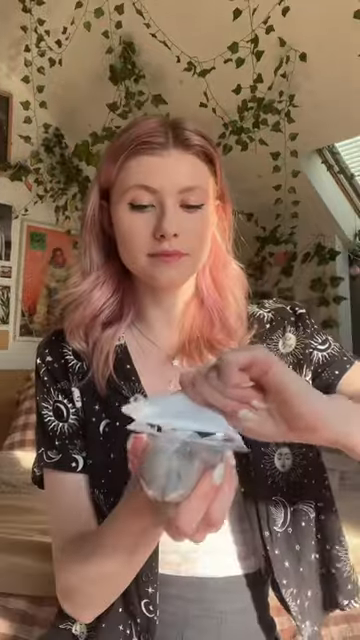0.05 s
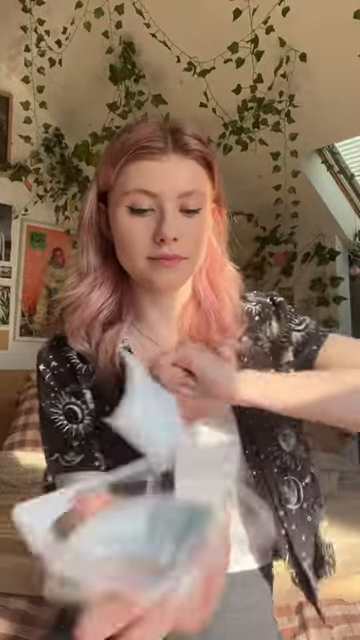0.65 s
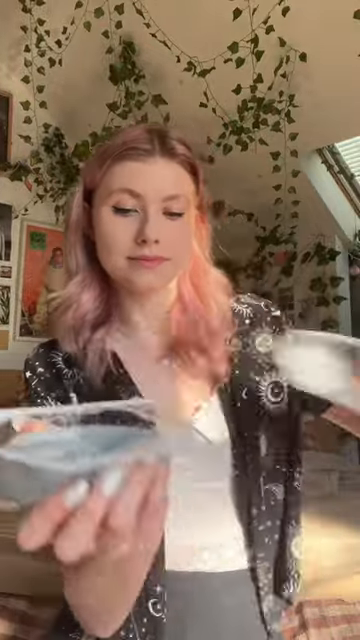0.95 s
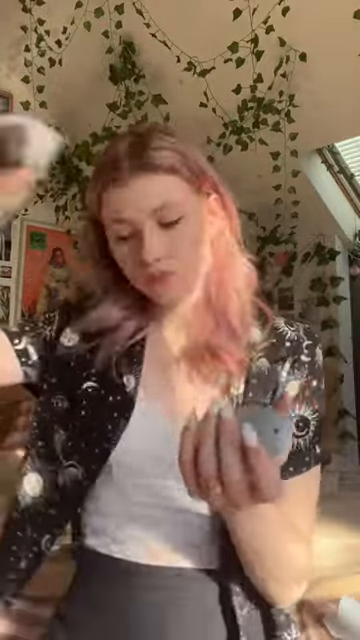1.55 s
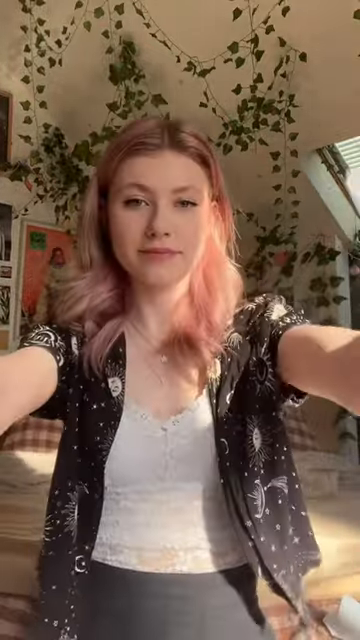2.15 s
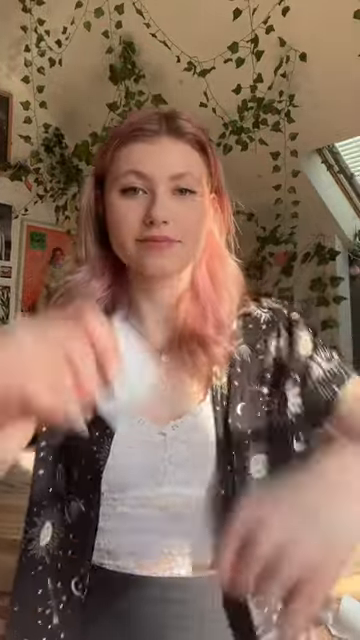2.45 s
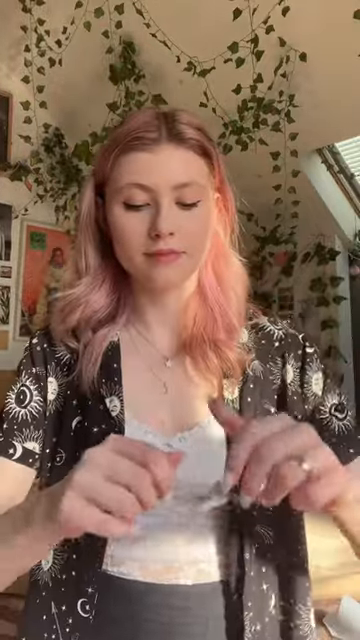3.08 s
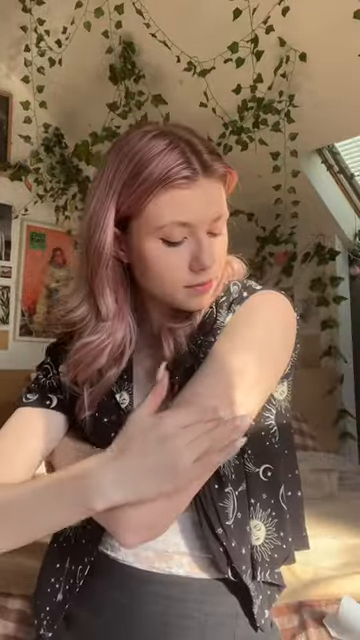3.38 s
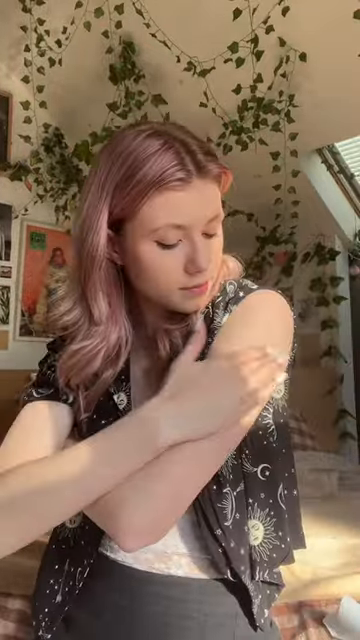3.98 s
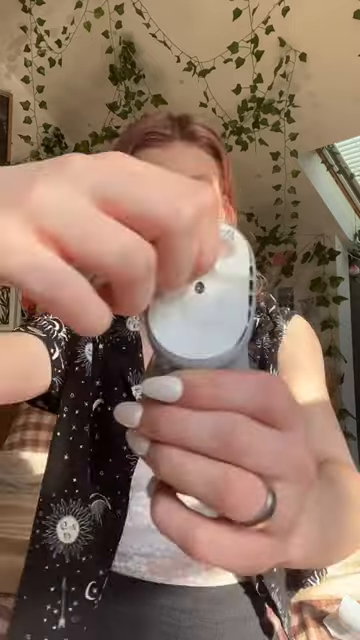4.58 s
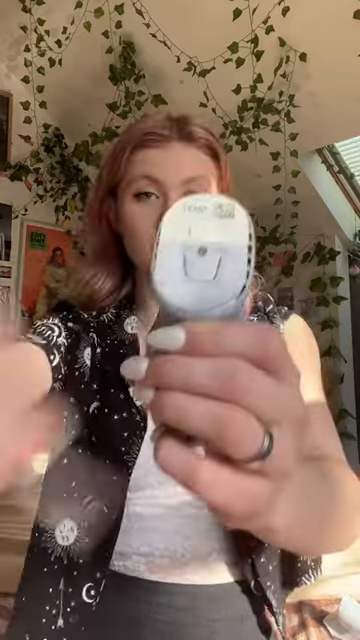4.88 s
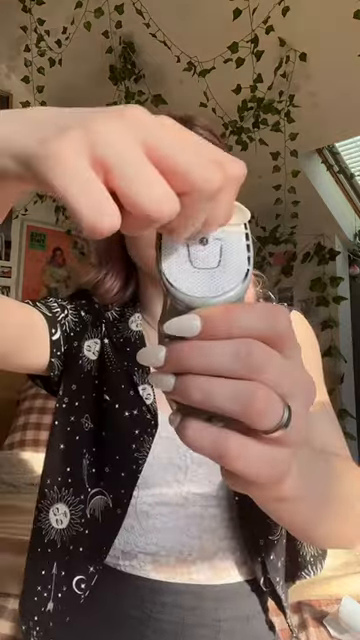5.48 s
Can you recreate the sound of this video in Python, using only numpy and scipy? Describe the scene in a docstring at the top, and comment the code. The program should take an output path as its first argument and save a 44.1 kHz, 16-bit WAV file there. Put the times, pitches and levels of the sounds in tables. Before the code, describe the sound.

A paper lid crinkles off a thin plastic tray, a sachet rips, a hand softly rubs skin, and a plastic cap clicks off.

```python
"""A small bedroom with a low rumble; mono, close to a phone. A paper lid peels off a thin plastic tray:
the glued seam slips, the tray rings, buckles and is put aside. A paper sachet rips in a run of snaps,
then a strip is pulled apart. A palm rubs an arm and squeaks while a faint tone comes and goes.
A plastic cap slides off with two clicks; a fingernail taps last.
The sound drops out briefly between some of the actions."""
import sys
import numpy as np
from scipy import signal
from scipy.fft import rfft, irfft
from scipy.io import wavfile
from scipy.ndimage import uniform_filter1d

SR = 44100
rng = np.random.default_rng(int(sys.argv[2]) if len(sys.argv) > 2 else 0)


def dump_mix(stems):
    """Bounce the given channels to the path in sys.argv[1] as a 16-bit WAV at rate SR."""
    frames = np.atleast_2d(stems).T  # one column per channel
    limited = np.clip(frames, -1, 1)  # hard clip at full scale
    pcm = np.round(limited * 32767).astype(np.int16)
    wavfile.write(sys.argv[1], SR, pcm)


N = 243889
TIME_S = np.arange(N) / SR
FREQS_HZ = np.arange(N // 2 + 1) * SR / N + 1e-3
OCTAVES_HZ = 125 * 2. ** np.arange(8)

# pulls on the lid; the favoured ring pitch moves as the seal's edge travels
# (start [s], length [s], level [dB], swell [dB], tilt [dB/oct], favoured [Hz], ring re seam [dB])
LID_PULLS = [(-.02, 0.046, -34.5, -6, 6.5, 422.7, -7), (.03, 0.13, -37.5, 2.5, -3, 401.5, -3.5),
             (.18, 0.12, -34.5, 4, -0.6, 500, -3.5), (.322, 0.07, -28, -1.5, -1, 1098, -3),
             (.464, 0.077, -36.5, -8.5, 1, 650, -1.5), (.595, 0.071, -48, -10, 0.5, 1290, -14)]
# tray resonances (centre [Hz], width [Hz], level [dB])
TRAY_MODES = [(451, 27, 2.5), (652, 22, -1), (1000, 32, -6), (1227, 60, -2), (1290, 9.1, 1),
              (1418, 190, -10.5), (1860, 120, -3), (2316, 140, 0.5), (2540, 78, -6), (3960, 56, -6.5),
              (3730, 120, -3), (4280, 90, -6.5)]

# jolts (time [s], level over 5 ms [dB], low edge [Hz], top edge [Hz], ring [Hz], ring [dB], contact [ms])
TRAY_SNAPS = [(0.0879, -13, 130, 9570, 4400, -2.5, 1.3), (0.3036, -12, 397, 13880, 5040, -2, 0.99),
              (0.5315, -30, 210, 7850, 4700, -2, 11), (0.57, -33.5, 410, 4830, 4560, 6, 2.9),
              (0.5885, -27.5, 354, 3500, 3660, 5.5, 6.4), (0.647, -42.5, 200, 2500, 1220, 9, 4.5),
              (0.7535, -44.5, 55, 5900, 3270, 8, 3.3), (0.806, -45, 101, 1998, 600, 21, 3.4),
              (1.046, -45, 55, 3970, 1350, 18, 5), (1.069, -39, 340, 9100, 1250, -10, 3.3),
              (1.074, -28, 710, 5530, 1200, -8, 6.2), (1.125, -31.5, 55, 7000, 1160, 6, 5.4),
              (1.1405, -26.5, 198, 2000, 2950, 8, 3.5), (1.207, -23, 380, 4070, 874, 5.5, 3.6),
              (1.2472, -25.5, 510, 9500, 2600, -6, 8.3), (1.3158, -41.5, 55, 4900, 2950, 9, 7.3),
              (1.3605, -42.5, 55, 20000, 3070, 6, 5.1), (1.553, -46.5, 55, 4530, 1170, 3, 5.5),
              (1.573, -45, 54.6, 4360, 2470, 3, 6.8), (1.597, -47.5, 55, 3240, 1260, 15, 6.6),
              (1.6958, -42, 900, 20100, 14100, 5, 2.8), (1.797, -39, 55, 3530, 1200, 2, 5.5),
              (1.8538, -39.5, 55.5, 5800, 310, 15, 18), (1.913, -49, 54.4, 3560, 2800, 17, 1.5)]
PAPER_CREASES = [(1.99, -36.5, 310, 6600, 4217, -10, 0.24), (2.3805, -47.5, 54.8, 8440, 3050, 7.5, 1.1),
                 (2.4448, -45, 54.3, 4280, 2800, 18, 12), (2.5955, -34.5, 90, 19800, 5760, 4, 5.4),
                 (2.607, -37, 56, 20000, 5270, -16, 0.88), (2.617, -41, 196, 20030, 754, -11, 1.1),
                 (2.6526, -36.5, 3000, 20000, 12000, 7, 0.26), (3.016, -58, 55, 4800, 2630, -6, 3)]
CAP_CLICKS = [(4.6495, -42.5, 900, 13900, 7450, 20, 0.74), (4.7359, -21, 1500, 5000, 8610, 15, 2.3),
              (4.7368, -22.5, 466, 970, 640, 0.69, .3), (4.7692, -22.5, 250, 6070, 3600, 2.4, 1.46),
              (4.7716, -24, 700, 5400, 5640, 4, 2.2), (5.497, -52.5, 56, 12100, 701, 10.4, 7.2)]

# friction strokes (start [s], length [s], level [dB], swell [dB], tilt [dB/oct])
FINGER_STROKES = [(.72, 0.24, -65.5, 3, 1.5), (.928, 0.066, -49, 8.5, 5.5), (1.07, 0.1, -41, -5.5, -2),
                  (1.335, 0.06, -49.5, 2, 0), (1.45, 0.093, -55.5, -7, -1.5),
                  (1.555, 0.042, -52.5, -0.5, -1), (1.72, 0.08, -61, 17, -1), (1.795, .085, -46, 3.5, -9),
                  (2.355, 0.13, -59, -9, 8.5), (2.53, 0.38, -61.5, -6.5, 0), (2.92, .065, -61.5, 0, 6)]
TEAR_STROKES = [(1.993, .048, -33, 12, 0.94)]
STRIP_PULLS = [(2.59, 0.028, -43.5, 6, -1.5), (2.64, 0.048, -38, -3, 1.5), (2.69, 0.062, -37.5, 7.5, 2.5)]
ARM_STROKES = [(3.17, 0.2, -72, -4, 1), (3.62, 0.46, -68, 3, 1.5), (4.07, 0.068, -64.5, -1, -4),
               (4.27, 0.16, -62.5, 1, 7)]
CAP_STROKES = [(4.646, 0.151, -38.5, 9.1, 0.38)]

# spells of a faint tone (start [s], length [s], level [dB], swell [dB], pitch [Hz])
TONE_SPELLS = [(3.27, 0.22, -64.5, -2, 358), (3.45, .11, -65, -4, 350), (3.97, 0.14, -68, -7, 338),
               (4.23, 0.072, -62.5, 10.5, 344.7), (4.44, .08, -65.5, 1, 337.6)]
# palm squeak (time [s], pitch [Hz])
SQUEAK_PITCH = [(4.25, 4840), (4.276, 4940), (4.474, 5111), (4.56, 4840)]

# spectra of the sources and the reverberation (frequency [Hz], level [dB])
RUMBLE_SPECTRUM = [(12, -54), (20, -31), (46, 2), (101, -3), (127, -5), (248, -13), (310, -16.5),
                   (347, -17.5), (388, -18), (513, -16.5), (558, -22), (642, -23.5), (897, -26.5),
                   (13500, -42), (16000, -51)]
SEAM_SPECTRUM = [(60, -18.5), (140, -4), (400, -2), (800, -2), (1400, -1.5), (2400, -0.5), (3300, -6),
                 (4400, -8), (6500, -11.5), (9000, -15.5), (11500, -26), (14000, -18.5), (16000, -20.5)]
CRACK_SPECTRUM = [(100, 1), (3000, 2), (8000, 2), (11000, -4), (14000, -1.5), (16000, -5)]
FINGER_SPECTRUM = [(88, -32.5), (150, -0.5), (341, -8), (514, 1.5), (745, -12), (1170, -4.5), (2100, -7),
                   (2700, -9), (6020, -9), (11900, -26.5), (14800, -22), (16000, -30)]
TEAR_SPECTRUM = [(40, -32), (120, 8.5), (300, -11.5), (600, -5), (1500, -6), (2800, -1.5), (4200, -11),
                 (7400, -2), (11000, -18), (16000, -32.5)]
STRIP_SPECTRUM = [(120, -29), (300, -6), (700, -10), (1200, -7), (2500, -7), (4500, -4), (7000, 0.5),
                  (9000, -0.5), (11500, -8.5), (14000, 1.5), (16000, -11)]
SKIN_SPECTRUM = [(400, -24), (1500, -11), (3200, 1.5), (5500, -0.5), (8000, -3.5), (11000, -10.5),
                 (14000, -6), (16000, -4)]
CAP_SPECTRUM = [(120, -28), (300, -11), (700, 2), (1100, 0), (1900, 0), (2700, 2.5), (4000, -3), (7400, 5),
                (9000, -1.5), (11500, -13), (14000, -13), (16000, -19)]
REVERB_SPECTRUM = [(100, -1), (1000, -2.5), (4000, -3), (8000, -4), (15000, -11)]

# room decay (frequency [Hz], T60 [s])
ROOM_T60 = [(150, 0.14), (600, 0.2462), (2500, 0.2375), (7000, 0.2759), (14000, 0.21)]
# gaps in the sound (start [s], end [s])
DROPOUTS = [(1.009, 1.016), (1.928, 1.977), (2.497, 2.527), (3.155, 3.176), (4.567, 4.577), (5.313, 5.381)]


def undb(db):
    """Decibels to gain."""
    return 10 ** (np.asarray(db) / 20)


def unit(x):
    """Scale to rms 1."""
    return x / np.sqrt(np.mean(x ** 2))


def on_log_axis(points, hz):
    """Read (frequency [Hz], value) points at hz."""
    f, value = np.transpose(points)
    return np.interp(np.log(hz), np.log(f), value)


def shaped(x, response):
    """Filter x by a frequency response."""
    return irfft(rfft(x) * response, len(x))


def resonance(f, hz, width_hz):
    """One damped mode, gain 1 at its centre."""
    return 1j * f * width_hz / (hz ** 2 - f ** 2 + 1j * f * width_hz)


def octave(f, hz):
    """Weight of the octave band at hz; the bands sum to 1."""
    return np.interp(np.log(f), np.log(OCTAVES_HZ), 1. * (OCTAVES_HZ == hz))


def walk(rate_hz):
    """Smooth random drift, rms 1."""
    hold = max(int(SR / rate_hz), 1)
    steps = rng.standard_normal(N)[np.arange(N) // hold]
    return unit(uniform_filter1d(steps, hold))


def placed(x, direct_db, room_db):
    """Two rows: direct sound, room feed."""
    return np.outer(undb([direct_db, room_db]), x)


def strokes(table, attack_s, release_s):
    """Strokes rise, swell or sag, and decay. Returns gain, then the sounding stroke's extra columns."""
    gains = []
    for start_s, length_s, db, swell_db, *_ in table:
        t = TIME_S - start_s
        held = undb(db + swell_db * (np.clip(t / length_s, 0, 1) - .5))
        attack = np.clip(t / attack_s, 0, 1)
        release = np.exp(-np.maximum(t - length_s, 0) / release_s)
        gains.append(held * attack * release)
    power = np.square(gains) + 1e-18
    total = power.sum(axis=0)
    extras = np.array(table)[:, 4:].T @ power / total
    return [np.sqrt(total), *extras]


def slips(rate_hz, spread_db, hiss_db):
    """Tiny random releases of uneven size over a hiss of countless smaller ones; rms 1."""
    sizes = undb(spread_db * np.clip(rng.standard_normal(N), -2, 2)) * rng.choice([-1, 1], N)
    releases = unit(sizes * (rng.random(N) < rate_hz / SR))
    return unit(releases + undb(hiss_db) * rng.standard_normal(N))


def friction(stroke, surface, drive, flicker_db):
    """Slips coloured by the surface; the stroke sets level and tilt, octaves flicker as grip shifts."""
    level, tilt_db_per_oct = stroke
    spectrum = rfft(unit(shaped(drive, undb(on_log_axis(surface, FREQS_HZ)))))
    sound, tilted_power, flat_power = 0, 0, 0
    for hz in OCTAVES_HZ:
        band = irfft(spectrum * octave(FREQS_HZ, hz), N)
        gain = undb(tilt_db_per_oct * np.log2(hz / 2000).clip(-1.5, 1.5))
        sound += band * gain * undb(flicker_db * walk(60))
        tilted_power += np.var(band) * gain ** 2
        flat_power += np.var(band)
    return sound * np.sqrt(flat_power / tilted_power) * level


def cracks(table, ring_q, room_db, bend_ms, chatter_db, size=4096, lead=16):
    """Each crack: a jolt and brief contact chatter in a ringing sheet. Returns direct sound, room feed."""
    out = np.zeros((2, N + size))
    t = np.arange(size) / SR
    f = np.arange(size // 2 + 1) * SR / size + 1
    bending = np.exp(-4j * np.pi * bend_ms / 1000 * np.sqrt(f * 1000))  # bending waves: lows arrive late
    blunting = 1 + 1j * f / 30000
    colour = undb(on_log_axis(CRACK_SPECTRUM, f))
    for time_s, db, low_hz, top_hz, ring_hz, ring_db, contact_ms in table:
        chatter = rng.standard_normal(size) * np.exp(-t * 1000 / max(contact_ms, .1))
        push = undb(chatter_db) * contact_ms * chatter / np.linalg.norm(chatter)
        push[0] += 1  # the jolt
        edges = (1j * f / (1j * f + low_hz)) ** 2 / (1 + 1j * f / top_hz) ** 2
        ring = 1 + undb(ring_db) * resonance(f, ring_hz, ring_hz / ring_q)
        crack = shaped(np.roll(push, lead), edges * ring * bending * colour / blunting)
        crack *= undb(db) * np.sqrt(.005 * SR) / np.linalg.norm(crack)
        start = int(time_s * SR) - lead
        out[:, start:start + size] += placed(crack, 0, room_db)
    return out[:, :N]


def room_tone(rumble_db=-55.5, hum_db=-60.5, hum_hz=100):
    """Low rumble and hiss, with weak mains hum."""
    rumble = unit(shaped(rng.standard_normal(N), undb(on_log_axis(RUMBLE_SPECTRUM, FREQS_HZ))))
    return undb(rumble_db) * rumble + undb(hum_db) * np.sin(2 * np.pi * hum_hz * TIME_S)


def tray_ring(favoured_hz, focus_db_per_oct=7, grip_damping=2.2):
    """Slips drive the tray's modes, widened by the holding hand; those off the favoured pitch ring less."""
    drive = rfft(slips(rate_hz=1800, spread_db=-2, hiss_db=-5.5))
    ring, power = 0, 0
    for hz, width_hz, db in TRAY_MODES:
        distance_oct = np.minimum(abs(np.log2(hz / favoured_hz)), 1.5)
        gain = undb(db - focus_db_per_oct * distance_oct)
        ring += gain * unit(irfft(drive * resonance(FREQS_HZ, hz, grip_damping * width_hz), N))
        power += gain ** 2
    return ring / np.sqrt(power)


def lid_peel(crinkle_db=-6.5):
    """At each pull the glued seam lets go in dense slips; the paper crinkles and the tray rings."""
    pull, tilt_db_per_oct, favoured_hz, ring_db = strokes(LID_PULLS, attack_s=.022, release_s=.018)
    glue = slips(rate_hz=3800, spread_db=8.5, hiss_db=-0.5)
    crinkles = undb(crinkle_db) * slips(rate_hz=160, spread_db=2.5, hiss_db=-20)
    seam = friction((pull, tilt_db_per_oct), SEAM_SPECTRUM, glue + crinkles, flicker_db=2)
    ring = tray_ring(favoured_hz) * pull * undb(ring_db)
    peel = (seam + ring) / np.sqrt(1 + undb(ring_db) ** 2)
    return placed(peel, direct_db=-1, room_db=-4)


def tray_snaps():
    """The thin tray buckles or is knocked."""
    return cracks(TRAY_SNAPS, ring_q=3, room_db=-2.5, bend_ms=.6, chatter_db=2)


def fingers():
    """Fingers shift on tray and paper."""
    stroke = strokes(FINGER_STROKES, attack_s=0.018, release_s=0.033)
    drive = slips(rate_hz=210, spread_db=1.5, hiss_db=2.5)
    rustle = friction(stroke, FINGER_SPECTRUM, drive, flicker_db=1)
    return placed(rustle, direct_db=-1.5, room_db=-18)


def paper_creases():
    """Creases in the paper give way."""
    return cracks(PAPER_CREASES, ring_q=2.3, room_db=-7, bend_ms=0.616, chatter_db=6.5)


def sachet_rip(count=7, start_s=1.9948, gap_s=.00772, middle_s=2.0205):
    """Paper catches and rips: near-even snaps, brightening, loudest mid-run; fibres part between them."""
    peak_db, fade_db, half_s = -17.5, 12, 0.022
    scatter_db, scatter_s, brighten_oct_per_s = 1.5, .0003, 26
    low_hz, top_hz, ring_hz, ring_db, contact_ms = 90, 10000, 1800, 5, 0.9
    run = []
    for k, (late, louder) in enumerate(rng.standard_normal((count, 2))):
        time_s = start_s + gap_s * k + scatter_s * late
        offset_s = time_s - middle_s
        db = peak_db - fade_db * abs(offset_s / half_s) ** 1.07 + scatter_db * louder
        brighter = 2 ** (brighten_oct_per_s * offset_s)
        run.append((time_s, db, low_hz, top_hz * brighter, ring_hz * brighter, ring_db, contact_ms))
    snaps = cracks(run, ring_q=2.2, room_db=-11.5, bend_ms=.6, chatter_db=-.5)
    stroke = strokes(TEAR_STROKES, attack_s=0.0045, release_s=0.0086)
    drive = slips(rate_hz=5100, spread_db=9, hiss_db=-10.5)
    fibres = friction(stroke, TEAR_SPECTRUM, drive, flicker_db=2.1)
    return snaps + placed(fibres, direct_db=2.5, room_db=-8)


def strip_pull():
    """The strip comes apart in three pulls."""
    stroke = strokes(STRIP_PULLS, attack_s=0.0056, release_s=.016)
    drive = slips(rate_hz=1600, spread_db=0.5, hiss_db=-2)
    rasp = friction(stroke, STRIP_SPECTRUM, drive, flicker_db=4)
    return placed(rasp, direct_db=-2.5, room_db=-7.5)


def arm_rub():
    """A palm rubs the arm in soft strokes."""
    stroke = strokes(ARM_STROKES, attack_s=0.055, release_s=0.048)
    drive = slips(rate_hz=8100, spread_db=4, hiss_db=0.5)
    rub = friction(stroke, SKIN_SPECTRUM, drive, flicker_db=0.1)
    return placed(rub, direct_db=0.5, room_db=-2)


def faint_tone(waver_hz=4, flicker_db=2):
    """A faint wavering tone comes and goes."""
    gain, centre_hz = strokes(TONE_SPELLS, attack_s=0.031, release_s=0.029)
    hz = centre_hz + waver_hz * walk(36)
    tone = unit(np.sin(2 * np.pi * np.cumsum(hz) / SR))
    return tone * gain * undb(flicker_db * walk(26))


def palm_squeak(level_db=-77, jitter_hz=50, flicker_db=3.04):
    """The palm squeaks thinly on the last stroke."""
    times_s, pitches_hz = np.transpose(SQUEAK_PITCH)
    hz = np.interp(TIME_S, times_s, pitches_hz) + jitter_hz * walk(400)
    gate = 1. * ((TIME_S >= times_s[0] - .01) & (TIME_S <= times_s[-1]))
    fade = uniform_filter1d(uniform_filter1d(gate, size=200), size=2600)
    gain = undb(level_db + flicker_db * walk(30)) * fade
    return placed(gain * np.sin(2 * np.pi * np.cumsum(hz) / SR), direct_db=0.5, room_db=-2)


def cap():
    """The cap scrapes along its seat and clicks free; the last click is a fingernail tap."""
    stroke = strokes(CAP_STROKES, attack_s=0.0076, release_s=0.0072)
    drive = slips(rate_hz=1000, spread_db=-2.5, hiss_db=0)
    slide = friction(stroke, CAP_SPECTRUM, drive, flicker_db=4)
    clicks = cracks(CAP_CLICKS, ring_q=2.9, room_db=-10.5, bend_ms=0.823, chatter_db=-2.5)
    return placed(slide, direct_db=0, room_db=-37) + clicks


def bedroom(feed, first_echo_s=0.0017, build_s=0.003, wall_s=.0107, wall_db=-1, size=22050):
    """Echoes build into a short tail, with one clear echo from the nearest wall."""
    t = np.arange(size) / SR
    f = np.arange(size // 2 + 1) * SR / size + 1
    echoes = rng.standard_normal(size)
    echoes *= 1 + 2 * (rng.random(size) < .02) * np.exp(-t / 0.047)  # sparse strong early echoes
    build = 1 - np.exp(-np.maximum(t - first_echo_s, 0) / build_s)
    wall = undb(wall_db) * np.exp(-((t - wall_s) / 0.00067) ** 2)
    tail = 0
    for hz in OCTAVES_HZ:
        decay = np.exp(-np.log(1000) * t / on_log_axis(ROOM_T60, hz))
        tail += shaped(echoes, octave(f, hz)) * decay
    tail *= build + wall
    response = shaped(tail / np.linalg.norm(tail), undb(on_log_axis(REVERB_SPECTRUM, f)))
    return signal.fftconvolve(feed, response)[:N]


def scene():
    """All sources in the room, same in both channels."""
    tray = lid_peel() + tray_snaps() + fingers()
    paper = paper_creases() + sachet_rip() + strip_pull()
    direct, feed = tray + paper + arm_rub() + palm_squeak() + cap()
    return np.tile(direct + bedroom(feed) + room_tone() + faint_tone(), (2, 1))


def record(dry, dropout_db=-44, top_hz=16000):
    """The phone rounds the peaks, the sound drops out briefly, and the top is cut."""
    gate = np.ones(N)
    for start_s, end_s in DROPOUTS:
        gate[(TIME_S > start_s) & (TIME_S < end_s)] = undb(dropout_db)
    gated = np.tanh(dry) * uniform_filter1d(gate, size=90)
    lowpass = signal.ellip(8, .2, 70, top_hz, fs=SR, output="sos")
    return signal.sosfilt(lowpass, gated)


dry = scene()
out = record(dry)
dump_mix(out)
```